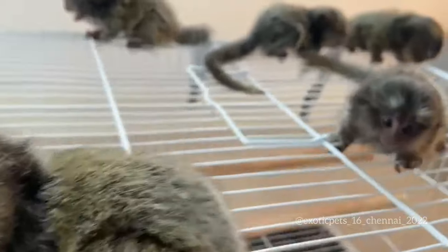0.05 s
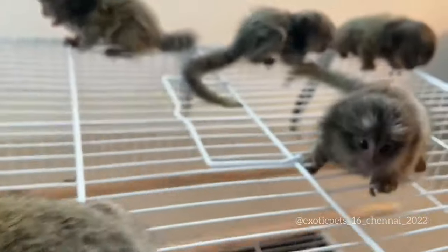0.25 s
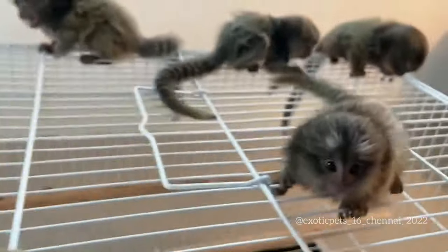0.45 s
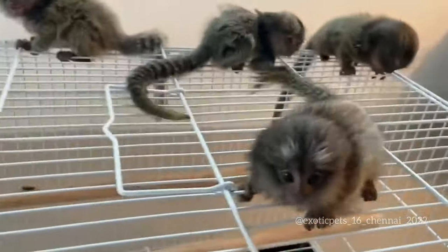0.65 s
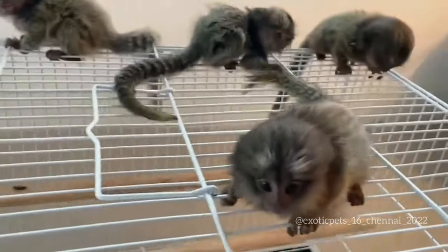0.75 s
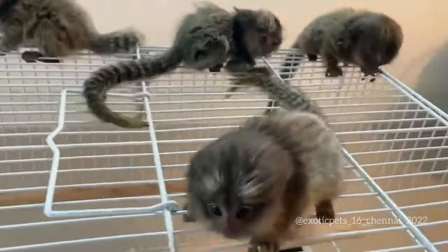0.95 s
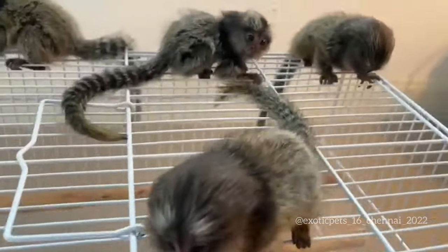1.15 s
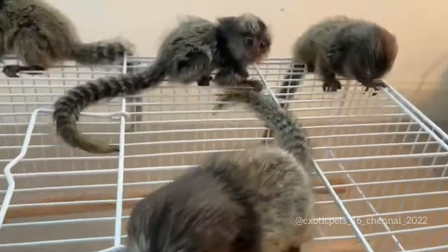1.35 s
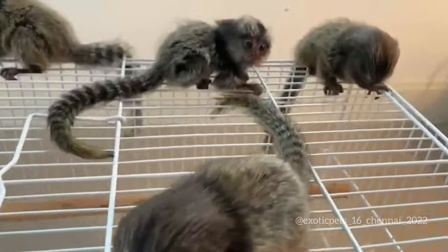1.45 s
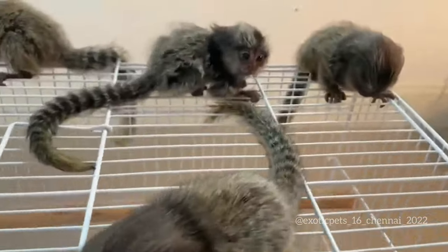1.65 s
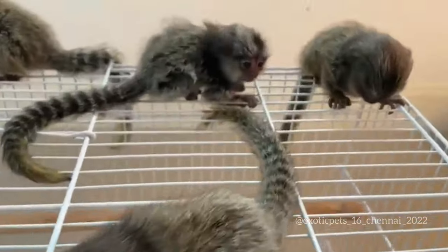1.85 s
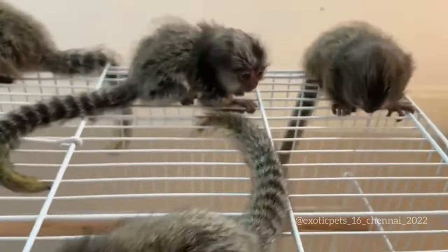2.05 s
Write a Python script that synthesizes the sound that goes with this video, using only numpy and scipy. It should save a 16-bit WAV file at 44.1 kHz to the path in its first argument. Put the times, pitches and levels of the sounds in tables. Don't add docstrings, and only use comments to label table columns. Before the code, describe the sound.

Small monkeys calling close up: a throaty, buzzing infant cry with a sharp alarm chirp, then hoarse whistles, a sinking warbled trill, two farther falling chirps and thin peeps, over faint cage thumps in a hard-walled room.

```python
import sys
import numpy as np
from scipy import signal
from scipy.fft import rfft, irfft, next_fast_len
from scipy.io import wavfile
from scipy.ndimage import uniform_filter1d, map_coordinates

SR = 44100
rng = np.random.default_rng(int(sys.argv[2]) if len(sys.argv) > 2 else 0)


def undo_db(level):
    steps = np.asarray(level, float) / 20
    return 10 ** steps


def store_wav(level_fs):
    pcm = np.round(np.clip(np.atleast_2d(level_fs), -1, 1) * 32767)
    wavfile.write(sys.argv[1], SR, pcm.T.astype(np.int16))


N = 92610

NOISY_HZ, RASP_HZ = 800, 1200
BASS_SIDE_DB = -8.5


def unit(x):
    return x / np.sqrt(np.mean(x ** 2) + 1e-20)


def along(points, hz):
    f, v = np.transpose(points)
    return np.interp(np.log(hz + 1), np.log(f + 1), v)


def wobble(rate_hz):
    knots = rng.standard_normal(int(N * rate_hz / SR) + 4)
    return map_coordinates(knots, [np.arange(N) * rate_hz / SR])


def filtered(x, response):
    m = next_fast_len(N + 8192)
    return irfft(rfft(x, m) * response(np.fft.rfftfreq(m, 1 / SR)), m)[..., :N]


def curves(rows):
    edge_s = 0.00172
    s, *cols = np.transpose(rows)
    t = np.arange(N) / SR
    gate = np.clip(np.minimum(t - s[0], s[-1] - t) / edge_s + 1, 0, 1)
    return t, gate, [np.interp(t, s, c) for c in cols]


def voice(hz, level, noisiness, wide_hz, ghost_db=-120):
    ghost_hz, ghost_below_hz, flutter_db = 7300, 8500, 1.5
    noisiness = np.clip(noisiness, 0, 1)
    noise = unit(wobble(2 * wide_hz)) + 1j * unit(wobble(2 * wide_hz))
    carrier = np.exp(2j * np.pi * np.cumsum(hz) / SR)
    tone = (np.sqrt(1 - noisiness) + np.sqrt(noisiness / 2) * noise) * carrier
    ghost_level = undo_db(ghost_db) * np.clip((ghost_below_hz - hz) / 600, 0, 1)
    ghost_level = ghost_level * (1 + 1.8 * unit(wobble(wide_hz / 2)))
    ghost = ghost_level * np.exp(2j * np.pi * ghost_hz * np.arange(N) / SR)
    return np.sqrt(2) * level * undo_db(flutter_db * wobble(90)) * np.real(tone * (1 + ghost))


def whistled(calls, wide_hz):
    drawn = [curves(rows) for rows in calls]
    return sum(voice(hz, gate * undo_db(db), noisiness, wide_hz) for _, gate, (hz, db, noisiness) in drawn)


def without_bass(x):
    low_hz = 3394
    return filtered(x, lambda f: 1 / (1 + (low_hz / (f + 1)) ** 12))


def cry():
    # (time [s], level [dB])
    cry_level = [(0, -46.5), (.146, -46), (.21, -48), (.34, -51.5), (.45, -43.5), (.53, -45), (.58, -57),
                 (.655, -73.5)]
    # (time [s], pitch [Hz])
    cry_pitch = [(0.0, 501.9), (0.044, 505.5), (0.192, 480.9), (0.262, 494.1), (0.276, 471.5),
                 (0.348, 464.6), (0.454, 476.2), (0.468, 478.9), (0.57, 485.2)]
    # (frequency [Hz], gain [dB])
    throat = [(1760, -39.5), (3100, -41), (3900, -20.5), (4930, -13), (5660, -11), (8500, -2),
              (10600, -10.5), (12600, -1), (15000, -4.5)]
    gain_db, leak_db, uneven_db = 10, -36, 5.5
    jitter, breath_share, breath_floor = 0.0018, 0.643, 0.4
    breath_hz, breath_wide_hz = 8600, 1100
    top_hz, end_s, close_s = 10300, 0.5775, 0.0059
    t, gate, (db,) = curves(cry_level)
    hz, = curves(cry_pitch)[2]
    phase = 2 * np.pi * np.cumsum(hz * (1 + jitter * wobble(39.7))) / SR
    buzz = np.zeros(N)
    for k in range(2, 33):
        buzz += undo_db(uneven_db * wobble(29.99)) * np.cos(k * phase + rng.uniform(0, 2 * np.pi))
    breath = filtered(rng.standard_normal(N),
                      lambda f: breath_floor + 2 / (1 + ((f - breath_hz) / breath_wide_hz) ** 4))

    def tract(f):
        leak = undo_db(leak_db) * (f < 3200) * 2000 / (f + 500)
        return undo_db(along(throat, f)) + leak

    sound = unit(filtered(unit(buzz) + breath_share * breath, tract))
    top = filtered(sound, lambda f: f > top_hz)
    body = (sound - top) * np.clip((end_s - t) / close_s, 0, 1)
    return (top + body) * undo_db(db + gain_db) * gate


def near_alarm():
    # (time [s], pitch [Hz], level [dB], noisiness [0-1])
    fall = [
        [(.207, 13100, -36, 0.96), (.213, 12950, -23, 0.77), (.231, 12900, -25, 1.11),
         (.2355, 13480, -12.5, 0.1), (.254, 13700, -16, 0.51), (.258, 13800, -40, 0.54),
         (.264, 12600, -24.5, 0.54)],
        [(.24, 9800, -22.5, 0.67), (.252, 9300, -29.5, 0.6), (.257, 8060, -14, 1), (.26, 6700, -32, 0.15),
         (.266, 4220, -35, 0)],
    ]
    return without_bass(whistled(fall, NOISY_HZ))


def whistles():
    # (time [s], pitch [Hz], level [dB], noisiness [0-1])
    near_calls = [
        [(.44, 10160, -38, 0.44), (.483, 10000, -32.5, 0), (.491, 9950, -22.5, 0.09), (.525, 10030, -38.5, 0.2),
         (.572, 9720, -65, 0.91)],
        [(.53, 9500, -27.5, 1.23), (.553, 9310, -32, 0.98), (.575, 9200, -41.5, 1.2)],
        [(.581, 9500, -32, 0.57), (.6, 9500, -24, 1)],
        [(.628, 9433, -21, 1.1), (.634, 9600, -26, 0.59), (.648, 9500, -32.5, 1)],
        [(.671, 8538, -33.5, 0.62), (.688, 8656, -30, 1.07), (.696, 8220, -48, 0.2), (.705, 8017, -26, 0.02),
         (.718, 7733, -48.5, 0.65)],
    ]
    # (time [s], pitch [Hz], level [dB], noisiness [0-1])
    peeps = [
        [(1.365, 10130, -48.5, 0.78), (1.371, 9514, -55, 0.5), (1.39, 8826, -49, 0.64)],
        [(1.712, 8690, -61, 0.8), (1.745, 8265, -42.5, 0.56), (1.76, 8693, -33, 0.1), (1.81, 8620, -44.5, 0.8)],
        [(1.84, 9354, -44.5, 1.23), (1.965, 8886, -46, 0.86)],
        [(2.03, 10800, -67, 0.6), (2.07, 9780, -45.5, 0.6), (2.1, 9703, -45, 0.5)],
    ]
    # (time [s], pitch [Hz], level [dB], noisiness [0-1])
    opening = [
        [(.929, 9100, -42, 0.85), (.96, 9050, -39, 1.18), (.972, 9050, -38, 0.29), (.985, 9050, -32, 0.9),
         (1.01, 9000, -38, 1.23), (1.03, 8950, -36, 0.94), (1.048, 8900, -40, 1.2)],
        [(1.054, 8700, -48, 1), (1.065, 8700, -35, 1.2), (1.1, 8600, -43, 1.2), (1.112, 8600, -49, 1.2),
         (1.122, 8600, -39.5, 0.68), (1.14, 8500, -51, 0.83)],
        [(1.048, 7800, -43.5, 0), (1.06, 7600, -34.5, 0), (1.07, 7650, -59.5, 0)],
        [(1.09, 7750, -40, 0.1), (1.105, 7500, -36, 0.03), (1.112, 7550, -47.5, 0)],
        [(1.045, 15300, -84.5, 1.1), (1.1, 15100, -63, 0.87), (1.135, 14900, -62.5, 1.1)],
        [(1.842, 5000, -51.5, 0.38), (1.92, 5200, -63, 0.94)],
    ]
    # (time [s], pitch [Hz], level [dB], noisiness [0-1])
    squeaks = [
        [(.605, 11900, -45.5, 1.23), (.625, 11500, -48, 0.9)],
        [(.65, 11550, -39.5, 1.1), (.672, 11400, -40, 1.2), (.676, 11180, -81, 1), (.695, 11550, -75.5, 1.2)],
        [(.65, 9800, -41, 1.1), (.69, 9662, -41.5, 1.1)],
        [(1.13, 13960, -76, 0.6), (1.3, 12270, -70, 0.9), (1.35, 12560, -68, 0.7), (1.39, 11700, -75.5, 1)],
    ]
    calls = whistled(near_calls + peeps + opening, NOISY_HZ)
    return without_bass(calls + whistled(squeaks, RASP_HZ))


def far_alarms():
    # (time [s], pitch [Hz], level [dB], noisiness [0-1])
    chirps = [
        [(1.533, 9720, -56.5, 1), (1.553, 9325, -55, 0.9), (1.556, 9700, -35.5, 1.16),
         (1.568, 8600, -39.5, 1.11), (1.573, 7167, -24.5, 0), (1.579, 5996, -36, 0.32),
         (1.587, 4043, -38.5, 0.54)],
        [(1.548, 13700, -67, 0.9), (1.571, 14200, -51, 0.6), (1.575, 14180, -37, 0.2), (1.59, 10630, -34, 1.08)],
        [(1.578, 8380, -45.5, 1.2), (1.587, 6883, -30.5, 0.43), (1.595, 6360, -46, 1)],
        [(1.788, 12910, -42, 0.5), (1.808, 12820, -37.5, 0.9), (1.814, 13580, -38.5, 1.1),
         (1.822, 12270, -26.5, 1.1)],
        [(1.812, 9500, -36.5, 1), (1.823, 9973, -40.5, .9), (1.829, 8390, -24.5, 0.88),
         (1.833, 7240, -34.5, 0.65), (1.841, 4126, -36, 0.07)],
        [(1.832, 9420, -32, 1.2), (1.843, 8253, -36.5, 1.2)],
    ]
    return without_bass(whistled(chirps, RASP_HZ))


def trill(rows, warble):
    rise_dip_db, band_lift, crest_point, ghost_db = 5, 0.8, 0.13, -19
    crest_s, rate_hz, rate_change = warble
    t, gate, (hz, db, noisiness, depth_hz) = curves(rows)
    u, noisiness = t - crest_s, np.clip(noisiness, 0, 1)
    turn = 2 * np.pi * (rate_hz * u + 0.5 * rate_change * u ** 2)
    clear = gate * np.sqrt(1 - noisiness) * undo_db(db + rise_dip_db * np.sin(turn))
    rough = gate * np.sqrt(noisiness) * undo_db(db + 4.5 * np.cos(turn))
    band = voice(hz + band_lift * depth_hz, rough, 0.954, NOISY_HZ)
    swing = np.cos(turn) + crest_point * np.cos(2 * turn)
    return voice(hz + depth_hz * swing, clear, 0.04, NOISY_HZ, ghost_db) + band


def trills():
    # (time [s], centre pitch [Hz], level [dB], noisiness [0-1], warble depth [Hz])
    long_trill = [(1.118, 7896, -47.5, 0.7, 523.3), (1.135, 7720, -39, 0.8, 594.5),
                  (1.15, 7488, -48, 0.4, 669.2), (1.3, 6918, -55.5, 0.54, 800),
                  (1.345, 6372, -58.5, 0.22, 876.5), (1.368, 5016, -50.5, 0, 147),
                  (1.392, 4126, -54.5, 0.29, 49)]
    last_trill = [(1.905, 7425, -50, 0.355, 487.8), (2.04, 7402, -49.5, 0.34, 512.8),
                  (2.068, 7540, -43, 0.054, 500), (2.1, 7050, -48.5, 0.234, 500)]
    # (a crest [s], rate [Hz], rate change [Hz/s])
    long_warble = (1.248, 22.4, -14)
    last_warble = (2.0, 20.8, 3)
    return without_bass(trill(long_trill, long_warble) + trill(last_trill, last_warble))


def cage():
    # (time [s], peak level [dB])
    thumps = [
        (0.09, -35),
        (0.457, -42),
        (0.658, -44.5),
        (0.786, -48),
        (1.047, -52),
        (1.757, -46),
        (1.957, -49.5),
    ]
    # (frequency [Hz], level [dB], t60 [s])
    bars = [(69.5, 0, 0.1234), (114.3, -7.5, 0.071), (202.9, -4.5, 0.04154), (272.04, -0.5, 0.04456)]
    # (time [s], level [dB])
    claws = [
        (.929, -54),
        (.674, -54),
        (1.558, -47),
        (1.831, -43),
        (.572, -54),
    ]
    # (time [s], frequency [Hz], level [dB], length [s])
    thin_tones = [
        (.25, 14643, -50, .41),
        (1.82, 13610, -55, .28),
        (1.57, 10800, -56, .07),
    ]
    puff_db, puff_t60_s, swell_s, tick_t60_s = -4.5, 0.11444, 0.04755, 0.06
    t, out = np.arange(N) / SR, np.zeros(N)
    puff = unit(filtered(rng.standard_normal(N), lambda f: f / (f + 40) / (1 + (f / 220) ** 2)))
    for s, db in thumps:
        u = np.maximum(t - s, 0)
        hit = undo_db(db + puff_db - 60 * u / puff_t60_s) * puff
        for hz, mode_db, t60_s in bars:
            mode_level = db + mode_db - 2 + rng.normal(0, 0.96)
            hit += undo_db(mode_level - 60 * u / t60_s) * np.sin(2 * np.pi * hz * u)
        out += hit * (1 - np.exp(-(u / swell_s) ** 2)) * 4
    decays = sum(undo_db(db - 60 * np.maximum(t - s, 0) / tick_t60_s) * (t >= s) for s, db in claws)
    out += filtered(decays * rng.standard_normal(N),
                    lambda f: (f / 3000) ** 3 / (1 + (f / 3000) ** 3) / (1 + (f / 9000) ** 8))
    for s, hz, db, length_s in thin_tones:
        gate = np.clip(np.minimum(t - s, s + length_s - t) / 0.025, 0, 1)
        out += gate * undo_db(db + 3.3 * wobble(11.96)) * np.sin(2 * np.pi * hz * t)
    side = undo_db(BASS_SIDE_DB) * (out - np.roll(out, 600))
    return out + side * [[0.4], [-0.4]]


def room(x):
    # (frequency [Hz], t60 [s])
    decay = [(300, 0.18), (5000, 0.54), (9000, 0.3527), (14000, 0.277)]
    tail_db, alike, early_db = -10, 0.35, -12
    hz, t, z = signal.stft(rng.standard_normal((2, SR // 2)), SR, nperseg=256)
    fade = undo_db(-60 * t / along(decay, hz)[:, None])
    a, b = signal.istft(z * fade, SR, nperseg=256)[1]
    turn = np.arccos(alike) / 2
    mid, side = np.cos(turn) * a, np.sin(turn) * b
    tail = np.array([mid + side, mid - side])
    tail = undo_db(tail_db) * np.pad(tail / np.linalg.norm(tail[0]), ((0, 0), (200, 0)))
    early = rng.uniform(-0.059, 1, (2, 7)) * rng.choice([-1, 1], 7)
    tail[:, rng.integers(40, 500, 7)] += undo_db(early_db) * early
    return signal.fftconvolve(x[None], tail, axes=1)[:, :N]


def hum():
    # (frequency [Hz], density [dB/Hz])
    tone_shape = [(15, -24.5), (25, 3), (293, -1.5), (846, -2.5), (4860, -14), (9000, -41.5),
                  (11700, -78.5), (19800, -120)]
    # (frequency [Hz], correlation [-1 to 1])
    likeness = [(60, 0.45), (500, 0.366), (1500, -0.098), (6000, 0.52)]
    tone_db, sink_db_per_s, top_hz = -66.5, 1, 9500
    rumble_db, rumble_swing_db = -71, -3

    def mid_side(f):
        turn = np.arccos(np.clip(along(likeness, f), -1, 1)) / 2
        shape = undo_db(along(tone_shape, f)) / (1 + (f / top_hz) ** 10)
        return shape * np.array([np.cos(turn), np.sin(turn)])

    mid, side = filtered(rng.standard_normal((2, N)), mid_side)
    level_db = tone_db - sink_db_per_s * np.arange(N) / SR + 1.6 * wobble(3.5)
    tone = undo_db(level_db) * unit(np.array([mid + side, mid - side]))
    shaken = rng.standard_normal((2, N)) * undo_db(rumble_swing_db * wobble(4.802))
    low_mid, low_side = filtered(shaken, lambda f: 1 / (1 + ((f - 75) / 30) ** 4))
    return tone + undo_db(rumble_db) * unit(low_mid + undo_db(BASS_SIDE_DB) * low_side * [[1], [-1]])


def ducked(floor, calls):
    duck_at_db, above_hz = -25.5, 1910
    level = np.sqrt(np.abs(uniform_filter1d(calls.mean(0) ** 2, size=2000)))
    upper = filtered(floor, lambda f: 1 / (1 + (above_hz / (f + 1)) ** 4))
    return floor - upper * level / (level + undo_db(duck_at_db))


def scene():
    # (sound, pan to the left [dB], level into the room [dB])
    parts = [(cry(), 0, 2),
             (near_alarm(), -0.88, -9.5),
             (whistles(), -0.16, 0),
             (far_alarms() + trills(), 0.5, 0)]
    near = sum(x * undo_db(np.array([[pan_db], [-pan_db]])) for x, pan_db, _ in parts)
    echoes = room(sum(x * undo_db(wet_db) for x, _, wet_db in parts))
    return near + echoes + cage() + ducked(hum(), near)


def top_cut(x):
    return signal.sosfilt(signal.butter(12, 15740, fs=SR, output="sos"), x)


def record(dry):
    top_hz, notch_hz, notch_wide_hz, notch_depth = 15750, 10959, 346.6, 0.763

    def port(f):
        notch = notch_depth * np.exp(-((f - notch_hz) / notch_wide_hz) ** 2)
        return (f < top_hz) * (1 - notch)

    mix = filtered(dry, port)
    return top_cut(mix)


dry = scene()
out = record(dry)
store_wav(out)
```